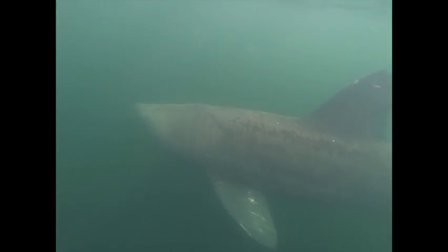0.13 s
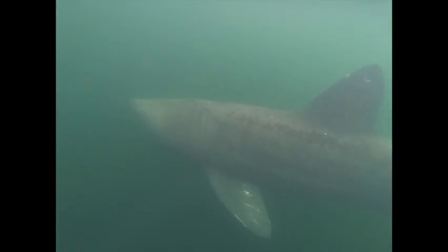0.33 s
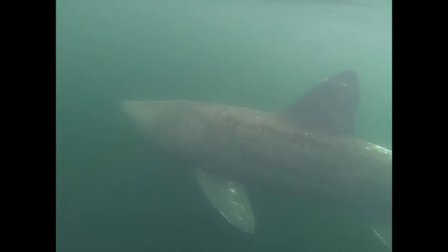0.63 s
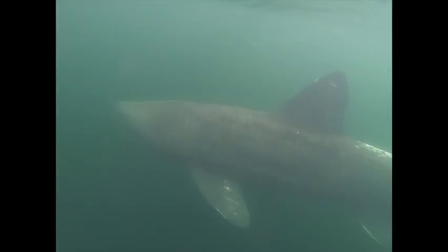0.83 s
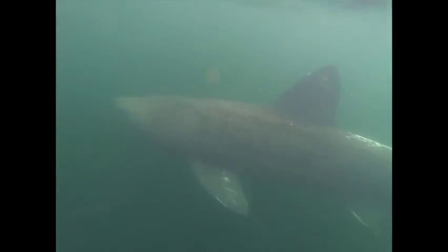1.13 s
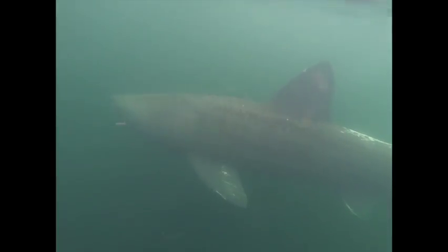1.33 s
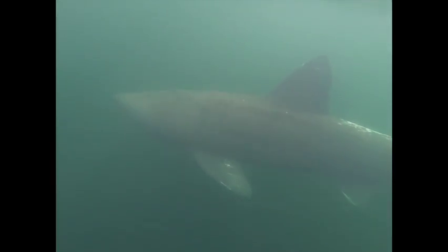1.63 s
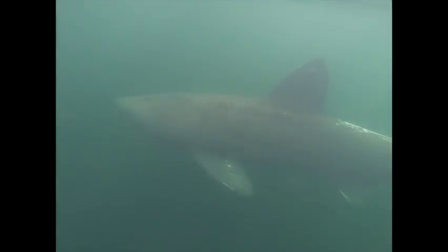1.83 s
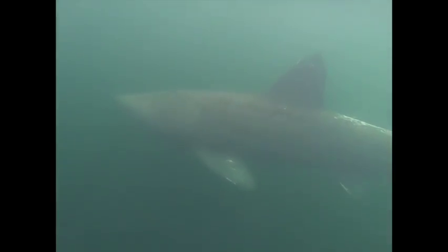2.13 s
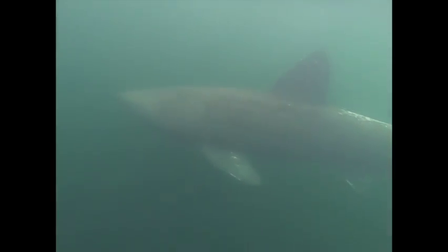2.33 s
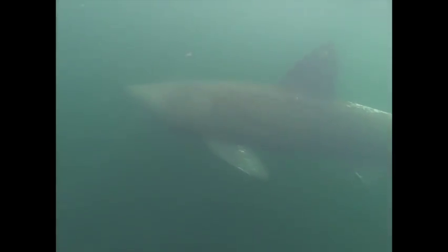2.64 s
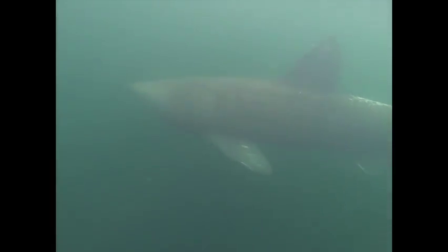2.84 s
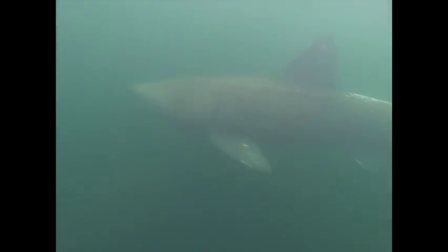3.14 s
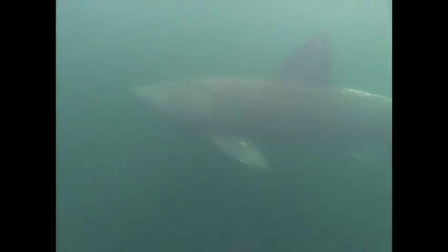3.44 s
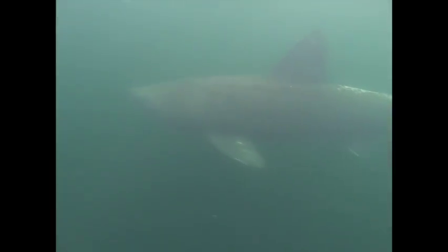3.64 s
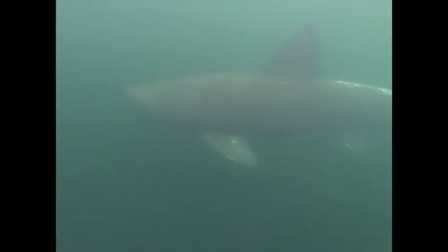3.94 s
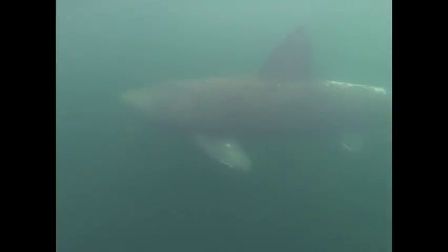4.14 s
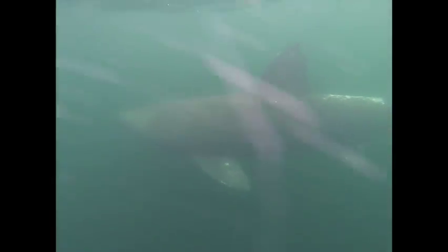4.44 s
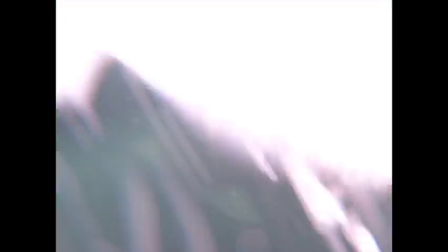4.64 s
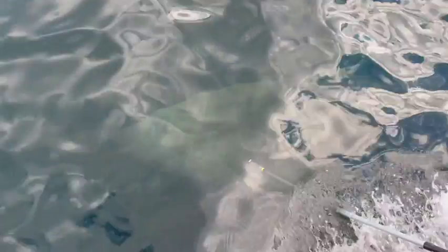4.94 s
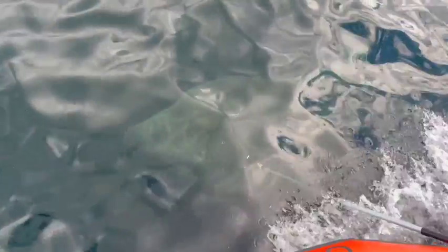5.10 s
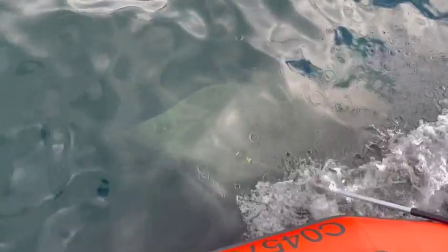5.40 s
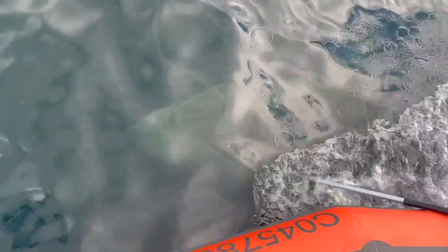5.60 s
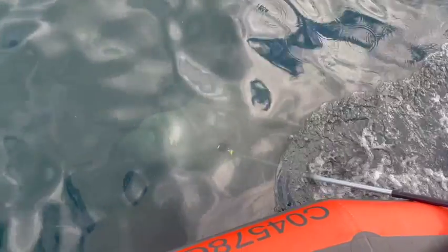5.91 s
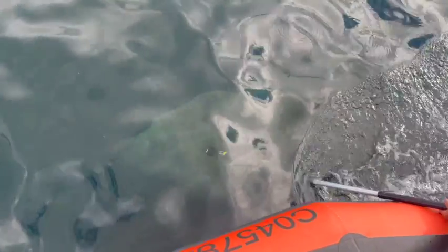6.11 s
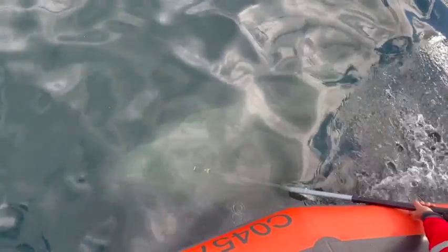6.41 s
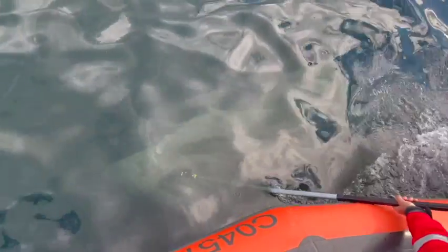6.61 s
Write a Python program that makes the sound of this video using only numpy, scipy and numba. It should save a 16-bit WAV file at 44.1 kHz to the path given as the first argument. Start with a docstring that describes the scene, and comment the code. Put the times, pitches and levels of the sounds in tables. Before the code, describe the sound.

Close, muffled and centred underwater sound: low round glugs, plopping bubbles and short singing glides over rumbling water, crowded at first, then sparse with small taps on a camera housing. A surge of big bubbles drains away, and the sound abruptly opens into stereo above water, with ribbed cloth zipping near the microphone, a wash of wavelets, fizzing foam and soft hollow laps on an inflatable boat.

```python
"""Trapped air glugs and bubbles plink around a camera in a housing just under the sea surface: sine plops
and noisy resonances. Shaped noise and bubble clouds rumble and rush, short rings tick on the housing, and
gliding sines sing, until a last surge of large bubbles. Then the scene jumps above water, to the side of an
inflatable boat: waves of coloured noise and bubbles lap on the tube, foam fizzes, and trains of rib ticks
zip like ribbed waterproof cloth close to the microphone."""
import sys
import numpy as np
from scipy import signal
from scipy.fft import rfft, irfft, next_fast_len
from scipy.io import wavfile
from scipy.ndimage import uniform_filter1d, minimum_filter1d
from numba import njit

SR = 44100
rng = np.random.default_rng(int(sys.argv[2]) if len(sys.argv) > 2 else 0)


def persist_wave(psi):
    """Save psi, clipped to +-1, as 16-bit WAV."""
    counts = np.round(np.clip(psi, -1, 1) * 32767).astype(np.int16)
    wavfile.write(sys.argv[1], SR, np.atleast_2d(counts).T)


N = 298116
TIME = np.arange(N) / SR
SURFACE_S = 4.778  # the jump from below to above water


def undb(db):
    """Decibels to gain."""
    return 10 ** (np.asarray(db) / 20)


def unit(x):
    """Scale to rms 1."""
    return x / np.sqrt(np.mean(x ** 2))


def swell(curve):
    """Gain that follows a curve of (time [s], level [dB])."""
    return undb(np.interp(TIME, *np.transpose(curve)))


def envelope(start_s, attack_s, hold_s, release_s):
    """Gain that grows exponentially to 1 at the start, holds and dies away exponentially."""
    early = np.maximum(start_s - TIME, 0)
    late = np.maximum(TIME - start_s - hold_s, 0)
    return np.exp(-np.minimum(early / attack_s + late / release_s, 30))


def bursts(rows, decay_s):
    """Gain that leaps up at each (time [s], level [dB], ..) and dies away."""
    leaps = sum(undb(db) * (TIME > s) * np.exp(-np.abs(TIME - s) / decay_s) for s, db, _ in rows)
    return uniform_filter1d(leaps, size=100)


def noise():
    """White noise."""
    return rng.standard_normal(N)


def colour(x, points):
    """Causal minimum-phase filter with the given (frequency [Hz], level [dB]) response; the result has rms 1."""
    hz, db = np.transpose(points)
    size = next_fast_len(N + 4096)
    grid = np.maximum(np.fft.rfftfreq(size, 1 / SR), 1)
    response_db = np.interp(np.log(grid), np.log(hz), db, left=-110, right=-110)
    # folding the cepstrum onto positive times makes the filter causal
    cepstrum = irfft(np.log(undb(response_db)), size)
    cepstrum[1:size // 2] *= 2
    cepstrum[size // 2 + 1:] = 0
    return unit(irfft(rfft(x, size) * np.exp(rfft(cepstrum)), size)[:N])


def walk(hz):
    """Smooth random wander with rms 1: noise low-passed at hz."""
    return unit(signal.sosfilt(signal.butter(2, hz, fs=SR, output="sos"), noise()))


def resonance(hz, width_hz):
    """A randomly driven resonance whose centre may move: two slow noises on a cosine and a sine."""
    phase = 2 * np.pi * np.cumsum(hz * np.ones(N)) / SR
    return unit(walk(width_hz / 2) * np.cos(phase) + walk(width_hz / 2) * np.sin(phase))


@njit
def add(out, start, size, hz, t60, glide, attack, hold):
    """Add decaying sines that swell over attack s and shift in pitch by the share glide over their t60."""
    for k in range(len(start)):
        first, phase = int(start[k] * SR), 0.
        for i in range(max(0, -first), min(int(t60[k] * SR), len(out) - first)):
            age = i / SR / t60[k]
            phase += 2 * np.pi * hz[k] * (1 + glide * (age - .2)) / SR
            onset = 1 - np.exp(-(i / SR / attack) ** 2)
            decay = np.exp(-6.9 * age ** hold)  # hold above 1 lingers first, then drops faster
            out[first + i] += size[k] * onset * decay * np.sin(phase)


def rings(rows, glide, attack_s, hold=1):
    """Play rows of (time [s], level [dB], pitch [Hz], t60 [s])."""
    s, db, hz, t60 = np.array(rows, float).T.copy()
    out = np.zeros(N)
    add(out, s, undb(db), hz, np.maximum(t60, 1 / SR), float(glide), float(attack_s), float(hold))
    return out


def plops(rows, cycles, glide, attack_s):
    """Play bubbles (time [s], level [dB], pitch [Hz]); equal cycles per ring make large, low ones last longer."""
    rows = np.array(rows, float)
    return rings(np.c_[rows, cycles / rows[:, 2]], glide, attack_s, hold=1.022)


def bubbles(count, low_hz, high_hz, cycles, spread_db, glide):
    """A cloud of bubbles at random times, with equal power at all pitches; spread_db spreads their levels."""
    when, pitch, size, life = rng.random((count, 4)).T
    hz = low_hz + (high_hz - low_hz) * pitch
    # a positive spread makes a few stand out, a negative one makes a few faint
    db = 10 * np.log10(hz) - spread_db * np.log(1 - .97 * size)
    t60 = cycles * (.5 + life) / hz
    return unit(rings(np.c_[when * N / SR, db, hz, t60], glide, 1 / high_hz))


def trapped_air():
    """Air pockets hum as they empty, and bubbles break off; each bubble rises in pitch as it nears the surface."""
    # ringing pockets: (time [s], length [s], level [dB], first pitch [Hz], last pitch [Hz])
    pockets = [(0, 0.49, -27.5, 305, 369.7), (1.144, 0.51, -22.5, 310, 271.2),
               (1.898, 0.7, -19.5, 300, 341.3), (2.621, 0.36, -35.5, 335, 349.3),
               (3.217, 0.15, -25, 125, 108.7)]
    # single bubbles, from big gulps to tiny pings: (time [s], level [dB], pitch [Hz])
    single_bubbles = [(0.273, -14, 830), (.322, -1.5, 347.6), (0.41, -4.5, 312), (0.482, -9.5, 288),
                      (.513, -18, 622), (0.524, -8.5, 1170), (.786, -37.5, 3360), (0.898, -9.5, 303),
                      (1.024, -29, 1690), (1.147, 1.5, 316), (1.167, -1, 323.5), (1.19, -20, 1130),
                      (1.227, -3.5, 278.5), (1.224, -14.5, 686), (1.334, 2, 270.5), (1.43, -2.5, 285.6),
                      (1.453, -5.5, 253), (1.524, -2.5, 249), (1.55, -15.5, 725), (1.754, -21.5, 1705),
                      (1.768, -12, 877), (1.788, -15, 659), (1.798, -7, 347), (1.83, -5.5, 312),
                      (1.947, -19.5, 828), (1.958, -6, 269), (2.005, -13.5, 468), (2.179, -17, 536),
                      (2.113, 3, 261), (2.361, -1.5, 311), (2.4, -4.5, 316), (2.416, -11, 713),
                      (2.456, -2, 328), (2.55, -6.5, 406), (2.57, -3, 301), (2.81, -7.5, 536),
                      (2.906, -16, 546), (3.099, -39, 1820), (3.14, -42, 2810), (3.21, -32, 1206),
                      (3.366, -28, 1370), (3.615, -36, 2150), (3.66, -34, 1730), (3.71, -37, 1750),
                      (4.007, -16, 778), (4.055, -11, 994), (4.13, -22.5, 1155), (4.173, -16, 938),
                      (4.204, -36, 3110), (4.629, -26, 1780), (4.651, -25, 1625), (4.661, -35, 2950),
                      (4.674, -30.5, 1520), (4.742, -43, 1560), (4.755, -47, 2830)]
    emptying_power = 2.8  # the pitch moves late
    pocket_db_per_octave = -9.5  # a smaller pocket is quieter
    out = np.zeros(N)
    for s, length, db, first_hz, last_hz in pockets:
        emptied = np.clip((TIME - s) / length, 0, 1) ** emptying_power
        hz = first_hz + (last_hz - first_hz) * emptied
        level_db = db + pocket_db_per_octave * np.log2(hz / first_hz)
        out += resonance(hz, width_hz=77.0) * undb(level_db) * envelope(s, 0.057, length, 0.045)
    for s, db, hz in single_bubbles:
        cycles = 33 * (hz / 300) ** 0.54  # higher bubbles ring for more cycles
        out += plops([(s, db, hz)], cycles, glide=0.045, attack_s=1.2 / hz)
    return out


def crackle():
    """Tiny bubbles bursting against the housing: a dense cloud of short, high rings."""
    # colour of the crackle: (frequency [Hz], density [dB per Hz])
    crackle_colour = [(700, -10), (1400, 4.5), (1750, 0.5), (2300, -3), (2800, -9), (3350, -6.5),
                      (4100, -16.5), (6000, -31), (9000, -69)]
    cloud = bubbles(count=9000, low_hz=650, high_hz=4700, cycles=22, spread_db=4.0, glide=.05)
    return colour(cloud, crackle_colour)


def underwater_flow():
    """Pressure swings rumble over a soft rush; clouds of bubbles churn and swarm along one shared level curve."""
    # colours of rumble, churn, swarm and rush: (frequency [Hz], density [dB per Hz])
    rumble_colour, churn_colour = [(11, -13), (18, -0.5), (38, -5.5), (86, -4), (135, -11.5), (190, -15.5),
                                   (250, -31.5), (420, -120)], [(90, -23.5), (170, -13.5), (260, -1), (360, -1.5),
                                                   (500, -8.5), (700, -16.5), (900, -19), (1200, -44)]
    swarm_colour, rush_colour = [(350, -20), (520, 0), (800, -1), (1000, -5), (1170, -3), (1350, -10),
                                 (1750, -13), (2000, -25), (2400, -41), (4000, -70)], [(280, -7), (400, 5.5), (615, 0), (800, 1.5), (1020, -16),
                                                (1600, -21), (2300, -23.5), (2700, -38.5), (3600, -48),
                                                (5000, -73.5)]
    # how hard the water pushes on the housing: (time [s], relative level [dB])
    push = [(0.0, -26), (0.62, -28.5), (.79, -22), (.85, -14.5), (.9, -21), (0.97, -16.5), (1.2, -20.5),
            (1.3, -25.5), (1.45, -22), (1.5, -18), (1.54, -25.5), (1.72, -14), (1.92, -23), (2.13, -30.5),
            (2.88, -30.5), (3.02, -21.5), (3.33, -23.5), (3.77, -26), (3.86, -24.5), (3.97, -24.5),
            (4.22, -23), (4.3, -20), (4.64, -12), (4.75, -25)]
    # level of the churn and swarm, which dips briefly after a loud gulp: (time [s], relative level [dB])
    cloud_level = [(0.0, -33), (.09, -41), (.21, -38.5), (0.3, -33.5), (0.5, -34), (.69, -35), (.78, -37),
                   (0.91, -35), (1.15, -36), (1.6, -32), (1.83, -31.5), (1.865, -39), (1.91, -36.5),
                   (1.94, -30), (2.25, -36), (2.65, -34), (2.9, -40), (3.08, -43), (3.88, -43.5),
                   (4.75, -44.5)]
    # clusters of tiny bubbles: (time [s], level of the crackle before its fits [dB])
    fizzing = [(0, -72), (.22, -64), (.38, -55), (.62, -63), (1.15, -62), (1.5, -62), (1.66, -56.5),
               (2.1, -60), (2.72, -61), (2.92, -69), (3.24, -65.5), (3.6, -61.5), (3.72, -75.5),
               (4.17, -64.5), (4.4, -58), (4.7, -71)]
    # water sliding along the housing: (time [s], level of the rush before its flutter [dB])
    sliding = [(0, -47.5), (1.8, -44), (2.75, -45), (3.07, -40.5), (3.45, -40), (4.05, -33), (4.45, -38),
               (4.75, -44)]
    rumble_db, churn_db, swarm_db = -1, 10, -2  # relative to the push and cloud level curves
    swarm_thinning = 0.68  # extra dB of swarm per dB of cloud level

    rumble = colour(noise(), rumble_colour) * swell(push) * undb(rumble_db)
    large = bubbles(count=2000, low_hz=117.0, high_hz=978.5, cycles=17, spread_db=1.5, glide=0.34)
    churn = colour(large, churn_colour) * undb(churn_db)
    small = bubbles(count=2200, low_hz=429.3, high_hz=2494, cycles=66, spread_db=3.0, glide=0.17)
    swarm = colour(small + undb(-8) * noise(), swarm_colour) * undb(2.6 * walk(24)) * undb(swarm_db)
    rush = colour(noise(), rush_colour) * swell(sliding) * undb(3.0 * walk(8.8))
    # the crackle comes in fits, and rises with the surge
    fits = swell(fizzing) * undb(4.5 * walk(14))
    fine = crackle() * (fits + surge_gain() * undb(-39.5))
    # where the clouds are quiet, the swarm of small bubbles drops further than the churn
    cloud_gain = swell(cloud_level)
    thinning = (cloud_gain / cloud_gain.mean()) ** swarm_thinning
    return rumble + rush + (churn + swarm * thinning) * cloud_gain + fine


def taps_and_clicks():
    """Each contact or click cracks briefly, rings a little differently and adds a puff of tiny bubbles."""
    # taps on the housing, and two faint broadband clicks of the limiter at loud gulps (1.148 s, 2.57 s):
    # (time [s], relative level [dB], tilt [dB per octave])
    ticks = [(.041, -31, -11.5), (.324, -24, -15), (0.403, -16, -0.5), (0.477, -29.5, -15.5),
             (0.514, -17.5, -9.5), (.915, -28, -13), (1.148, -33, 4), (1.522, -28.5, -12.5),
             (1.55, -26.5, -3), (1.612, -28, 9), (1.63, -35, 10), (1.822, -17.5, -9.5), (2.398, -25, -8),
             (2.57, -35, 0), (2.978, -25.5, -7.5), (3.025, -39, 11), (3.181, -31, 4), (3.252, -34, 12.5),
             (3.277, -32, 9), (3.336, -16.5, 3), (3.353, -23, 2), (3.47, -31, -3), (3.51, -16, -5.5),
             (3.567, -26, 4.5), (3.587, -23, -3), (3.775, -24, -5.5), (3.834, -24, -4.5),
             (3.867, -23.5, -2), (3.946, -25.5, -8), (4.055, -21.5, -11), (4.207, -28, 8), (4.368, -40, 17),
             (4.428, -22.5, 3.5), (4.483, -31.5, 12), (4.52, -38.5, 12.5), (4.546, -33, -1),
             (4.608, -26.5, 11), (4.629, -30.5, -11), (4.649, -22.5, -6)]
    # what the housing rings with: (nominal pitch [Hz], relative level [dB], t60 [s])
    modes = [(362.7, -12.5, 0.061), (565, -7.5, 0.0036), (774, 5.5, 0.014), (1010, 18.5, 0.0048),
             (1440, 6, 0.0094), (1782, -8, 0.023), (2240, -17.5, 0.01)]
    # colour of the crack: (frequency [Hz], density [dB per Hz])
    crack_colour = [(700, -13), (1500, 3), (2400, 7), (3200, 0), (4300, -16), (5200, -26.5), (8000, -37.5)]
    hz, db, t60 = np.transpose(modes)
    detune = 1 + 0.028 * rng.standard_normal((len(ticks), len(hz)))
    rows = []
    for (s, peak, tilt), shift in zip(ticks, detune):
        mode_db = peak + db + tilt * np.log2(hz / 1700)
        rows.append(np.c_[np.full(len(hz), s), mode_db, hz * shift, t60])
    ringing = rings(np.vstack(rows), glide=0, attack_s=0.0015) * undb(0.5)
    # a brighter tilt makes the crack and the puff louder
    crack_gain = sum(undb(peak + tilt) * envelope(s, 0.0006, 0.0015, 0.0023) for s, peak, tilt in ticks)
    puff_gain = sum(undb(peak + tilt) * envelope(s, 0.003, 0.004, 0.014) for s, peak, tilt in ticks)
    cracks = colour(noise(), crack_colour) * crack_gain * undb(-21)
    puffs = crackle() * puff_gain * undb(-28)
    return ringing + cracks + puffs


def gliding_bubbles():
    """A bubble squeezed along the housing holds a wavering tone that slides with its size."""
    # singing bubbles: (time [s], length [s], level [dB], first pitch [Hz], last pitch [Hz]),
    # before waver and flutter
    glides = [(0.295, 0.072, -18, 376, 332.4), (.385, 0.045, -17, 353, 384), (0.454, 0.1, -19, 425, 487),
              (0.587, .07, -24.5, 559, 590), (.8, .13, -61, 3390, 3400), (1.173, 0.046, -11.5, 323, 295),
              (1.217, 0.025, -13, 438, 412), (1.245, 0.1, -17, 279.6, 296.7), (1.367, .12, -17, 275.7, 288),
              (1.56, 0.078, -27, 710, 753), (1.796, .04, -10, 175, 298), (1.835, .04, -14, 309.6, 300),
              (2.069, 0.047, -12, 239, 320), (2.179, 0.06, -8.5, 269.8, 279), (2.25, 0.036, -2, 293.7, 302),
              (2.653, .11, -24.5, 453, 556), (4.068, 0.042, -27.5, 1000, 1140)]
    waver = 1 + .015 * walk(40)  # share of the pitch
    flutter = undb(2 * walk(35))
    out = np.zeros(N)
    for s, length, db, first_hz, last_hz in glides:
        hz = np.interp(TIME, [s, s + length], [first_hz, last_hz]) * waver
        tone = np.sin(2 * np.pi * np.cumsum(hz) / SR)
        out += undb(db) * envelope(s, 0.005, length, 0.0035) * tone
    return out * flutter


def surge_gain():
    """The last surge builds, holds and drains."""
    return undb(-10.5) * envelope(4.493, attack_s=0.076, hold_s=0.12, release_s=0.05)


def surge():
    """A wave folds a mass of large bubbles over the housing and drains off with a sinking, bubbly squelch."""
    # colour of the surge: (frequency [Hz], density [dB per Hz])
    surge_colour = [(41, -57.5), (70, 7.5), (124, -5), (188, 4), (384, 3), (452, -5.5), (800, -29),
                    (1040, -79.5), (1760, -120)]
    # pockets of froth that the water drains through: (pitch before sinking [Hz], width [Hz], relative level [dB])
    froth_pockets = [(1794, 290, 0), (3050, 440, -8)]
    squelch_s, sink_octaves_per_s = 4.645, 0.61
    mass = bubbles(count=4000, low_hz=88.5, high_hz=880, cycles=5.6, spread_db=-1.0, glide=0.28)
    large = colour(mass, surge_colour)
    sink = 2 ** (-sink_octaves_per_s * np.clip(TIME - squelch_s, 0, .1))
    froth = sum(undb(db) * resonance(hz * sink, width_hz) for hz, width_hz, db in froth_pockets)
    squelch_gain = undb(-37.5) * envelope(squelch_s, attack_s=0.018, hold_s=0.045, release_s=0.011)
    squelch = (froth + crackle() * undb(-9.5)) * squelch_gain
    return large * surge_gain() + squelch


def spread(source, side_db):
    """Two unrelated runs of a source as the middle and the sides of the stereo picture."""
    sides = source() * np.array([[1], [-1]])
    return unit(source() + undb(side_db) * sides)


def sea_surface():
    """Wavelets wash and slap against the tube, its air ringing under each lap; the foam they leave fizzes."""
    # colours of the wash and the foam: (frequency [Hz], density [dB per Hz])
    wash_colour, foam_colour = [(15, -45), (25, 0), (54, 1), (308, -2.5), (689, -8), (770, -13.5),
                                (895, -11.5), (1330, -19), (1480, -29), (2200, -31), (2860, -69),
                                (4840, -120)], [(820, 11.5), (1350, 5.5), (1500, -3), (1830, -5.5),
                                              (3350, -2.5), (3970, -3.5), (8520, -7), (11000, -15),
                                              (15000, -44)]
    # waves that reach the boat: (time of the crest [s], wash level [dB], foam level [dB])
    waves = [(5.05, -34, -30), (5.85, -36, -50.5), (6.298, -41.5, -44.5), (6.719, -42, -43.5)]
    # laps against the tube: (time [s], relative level [dB], pitch [Hz])
    lap_rows = [(5.334, -23, 465), (5.374, -22, 585), (5.503, -29, 186), (5.67, -19, 312),
                (5.673, -32, 920), (5.687, -26, 167), (5.773, -27.5, 129), (5.845, -19, 330),
                (5.868, -17, 894), (5.873, -19.5, 395), (5.95, -24.5, 260), (6.03, -24.5, 276),
                (6.062, -22, 191), (6.175, -19.5, 464), (6.211, -32, 387), (6.389, -16, 680),
                (6.559, -15, 710)]

    def wash_run():
        wavelets = bubbles(count=3500, low_hz=87.5, high_hz=2212, cycles=22.5, spread_db=0.0, glide=0.31)
        return colour(wavelets + undb(7.5) * noise(), wash_colour)

    def foam_run():
        fizz = bubbles(count=16000, low_hz=1300, high_hz=14000, cycles=21.0, spread_db=4.5, glide=0.19)
        return colour(fizz + undb(4) * noise(), foam_colour)

    wash = spread(wash_run, side_db=-9.0)
    foam = spread(foam_run, side_db=-1.5)
    # every wave lifts the wash and the foam above their calm levels
    wash_gain, foam_gain = undb(-45.5), undb(-60)
    for s, wash_db, foam_db in waves:
        wave = envelope(s, attack_s=0.35, hold_s=0.068, release_s=0.17)
        wash_gain = np.hypot(wash_gain, undb(wash_db) * wave)
        foam_gain = np.hypot(foam_gain, undb(foam_db) * wave)
    # every lap is a ringing air cavity and a short splatter of the wash
    splatter = bursts(lap_rows, decay_s=0.012) * undb(-16.0)
    laps = plops(lap_rows, cycles=24.6, glide=0.12, attack_s=0.0038) * undb(-3.5)
    # the tube gives under each lap, a little later
    thud_hz, thud_lag_s, thud_db = 122, 0.0137, -11
    thud_rows = [(s + thud_lag_s, db + thud_db, thud_hz) for s, db, _ in lap_rows]
    thuds = plops(thud_rows, cycles=9.4, glide=-0.15, attack_s=0.0038)
    washing = wash * (wash_gain * undb(2 * walk(14.3)) + splatter)
    return washing + laps + thuds + foam * foam_gain


def disperse(x, pitches_hz):
    """All-pass filters that spread a click into a short ring without colouring it."""
    for hz in pitches_hz:
        _, poles = signal.iirnotch(hz, 4, fs=SR)
        x = signal.lfilter(poles[::-1], poles, x)
    return x


def cloth():
    """Ribs catch and slip, a rustling tick each; as they speed up, the ticks blur towards a smooth hiss."""
    # strokes: (time [s], attack [s], hold [s], release [s], relative level [dB],
    # nominal rib rate [1/s], speed-up [octaves/s])
    strokes = [(4.7775, 0.0047, 0.012, 0.0032, -24, 238, 1.5),
               (4.82, 0.0009, 0.0098, 0.004, -23.5, 192, -1.5),
               (4.8505, 0.00091, 0.017, 0.0096, -25, 186, -0.5), (4.899, 0.01, 0.047, 0.023, -23.5, 325, 1),
               (4.974, 0.017, 0.051, 0.065, -22, 380, 15.5), (6.559, 0.013, 0.017, .004, -24.5, 370, 28.5),
               (6.73, 0.0061, 0.017, 0.026, -29.5, 390, 13)]
    # colour of the cloth: (frequency [Hz], density [dB per Hz])
    cloth_colour = [(240, -34), (400, -1.5), (673, -5), (850, -0.5), (1330, -2.5), (1500, -8), (2560, 0),
                    (2840, -20), (3250, -1.5), (3740, -0.5), (4250, -5), (4600, -7), (5100, -4),
                    (6000, -1.5), (7000, -3), (7900, -4), (8700, 4), (10700, -12.5), (12200, -33),
                    (16500, -38)]
    # a tick lingers briefly at these pitches: [Hz]
    rib_rings = (3800, 6000, 9300)
    top_rate = 950  # ribs per s
    jitter_hz = 16  # ribs catch unevenly, which counts for less as they speed up
    click_share = .8  # clean click in a tick; the rest is rustle, so no two ticks are alike
    rustle_s = 0.00054  # decay of the rustle after each tick

    gains = np.array([undb(db) * envelope(s, attack, hold, release)
                      for s, attack, hold, release, db, _, _ in strokes])
    # the strongest stroke sets the pace
    start, *_, first_rate, speed_up = np.array(strokes)[gains.argmax(axis=0)].T
    rate = first_rate * 2 ** (speed_up * np.clip(TIME - start, -.05, .5))
    rate = np.minimum(rate, top_rate)
    turns = np.cumsum(rate * np.exp(jitter_hz / rate * walk(120))) / SR
    turns = turns - np.interp(start, TIME, turns)  # each stroke starts on a rib
    clicks = (np.diff(np.floor(turns), prepend=0) != 0) * np.sqrt(SR / rate)
    since_rib_s = (turns % 1) / rate
    rustle = np.exp(-since_rib_s / rustle_s) * noise() * np.sqrt(2 / (rate * rustle_s))
    ticks = np.sqrt(click_share) * clicks + np.sqrt(1 - click_share) * rustle
    ticks = ticks * undb(2.0 * walk(250))
    blur = .65 * (rate / top_rate) ** 3
    ribs = np.sqrt(1 - blur) * disperse(ticks, rib_rings) + np.sqrt(blur) * noise()
    zipping = colour(ribs, cloth_colour) * gains.sum(axis=0) * undb(-1.5)
    # a thin squeak ends one stroke: a narrow ring in the hiss of the sliding cloth
    squeak = resonance(5650, width_hz=960) + colour(noise(), cloth_colour) * undb(4)
    squeak_gain = undb(-36.5) * envelope(6.6, attack_s=0.0094, hold_s=0.024, release_s=0.0065)
    sound = zipping + squeak * squeak_gain
    # it lies to one side: the left port hears it later, and the body scatters a part
    late = np.roll(sound, 8)  # samples
    loudness = np.sqrt(np.abs(uniform_filter1d(sound ** 2, size=128)))
    scatter = colour(noise(), cloth_colour) * loudness * undb(-5)
    return np.array([late * undb(2.8) + scatter, sound - scatter])


def scene():
    """Under water both ports hear the same muffled sound; above it the sound opens into stereo."""
    # 10 ms ramps overlap around the jump
    under = np.clip((SURFACE_S - TIME) * 100 + 1, 0, 1)
    above = np.clip((TIME - SURFACE_S) * 100 + 1, 0, 1)
    muffle = signal.butter(8, 4700, fs=SR, output="sos")
    water = trapped_air() + underwater_flow() + taps_and_clicks() + gliding_bubbles() + surge()
    submerged = signal.sosfilt(muffle, water)
    return under * submerged + above * (sea_surface() + cloth())


def record(dry):
    """The camera's limiter ducks both channels around peaks above 0.8, and a steep low-pass cuts the top."""
    allowed = np.minimum(1, .8 / (np.abs(dry).max(axis=0) + 1e-9))
    gain = uniform_filter1d(minimum_filter1d(allowed, size=500), size=500)
    top_cut = signal.ellip(8, .2, 70, 15900, fs=SR, output="sos")
    return signal.sosfilt(top_cut, dry * gain)


dry = scene()
out = record(dry)
persist_wave(out)
```